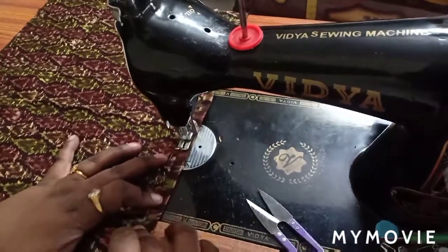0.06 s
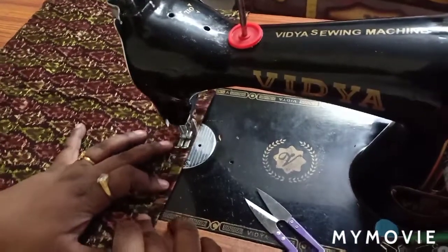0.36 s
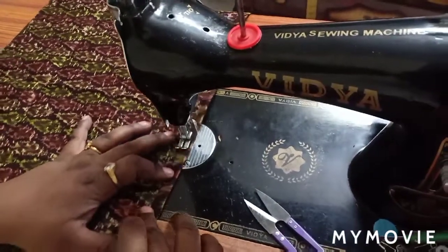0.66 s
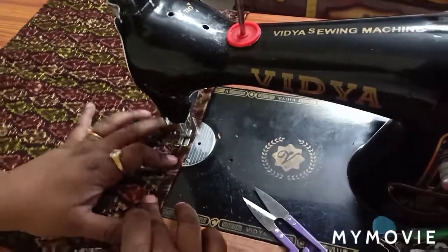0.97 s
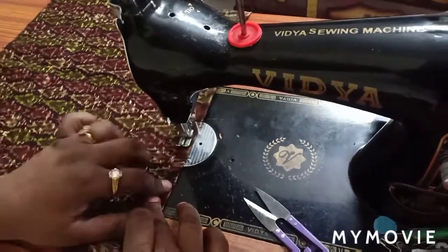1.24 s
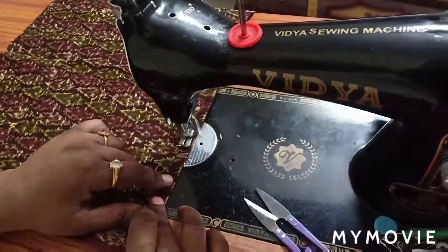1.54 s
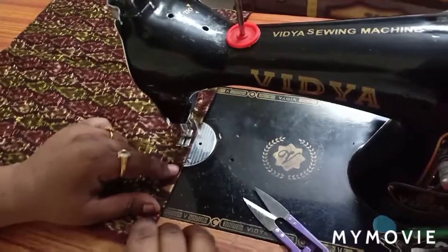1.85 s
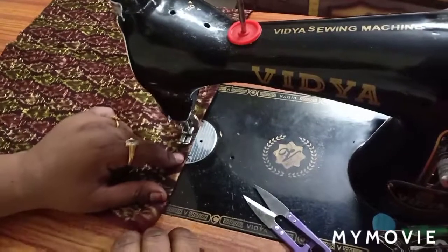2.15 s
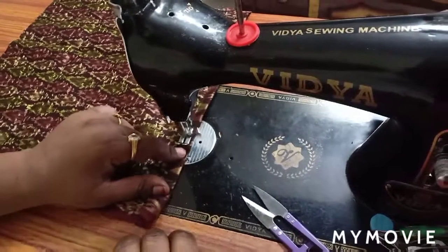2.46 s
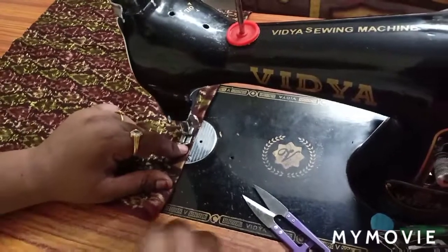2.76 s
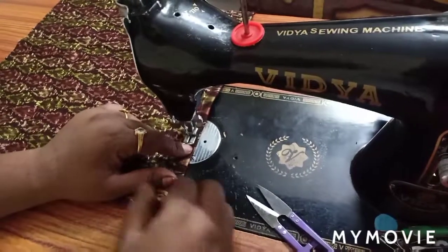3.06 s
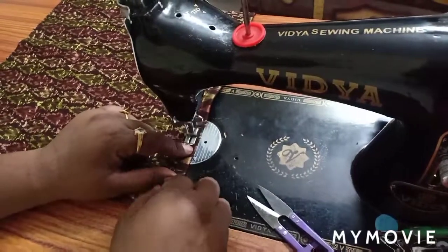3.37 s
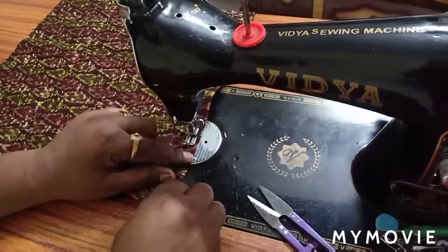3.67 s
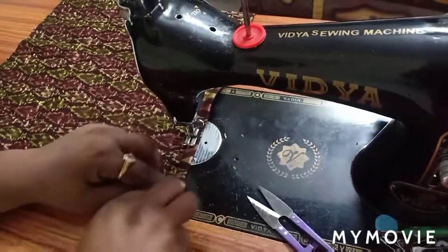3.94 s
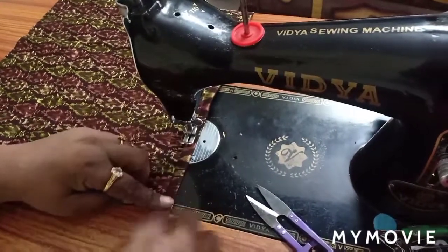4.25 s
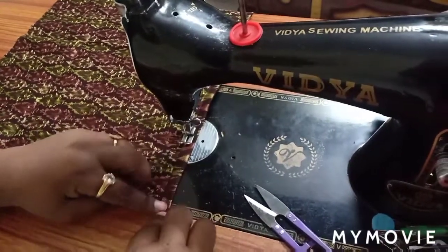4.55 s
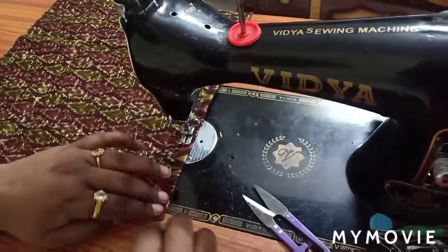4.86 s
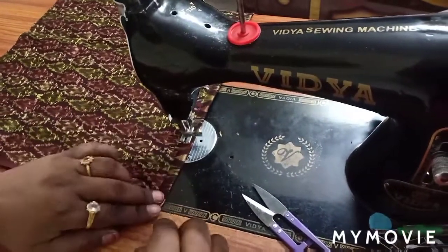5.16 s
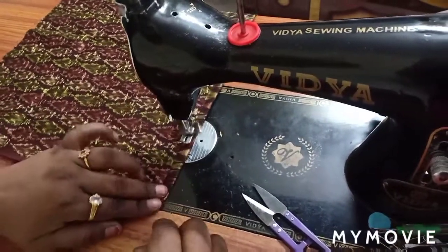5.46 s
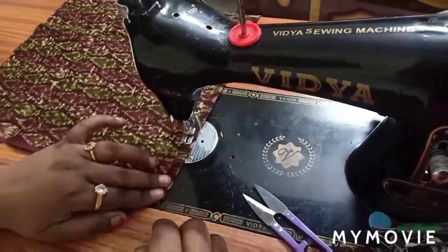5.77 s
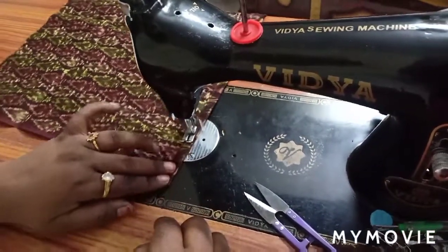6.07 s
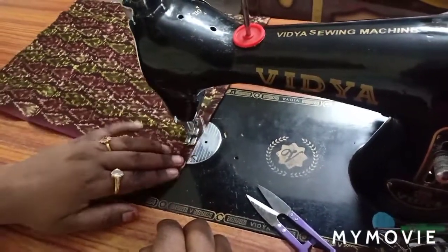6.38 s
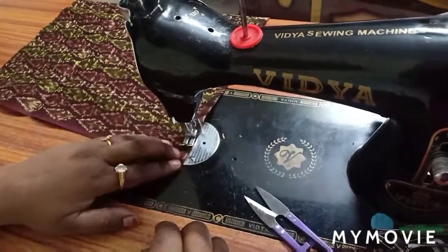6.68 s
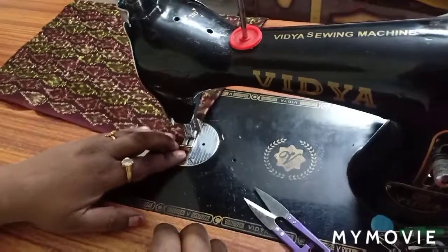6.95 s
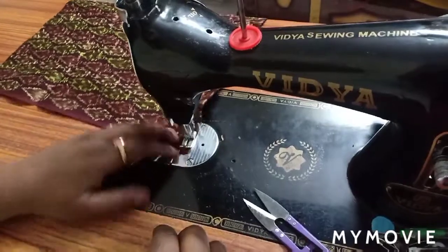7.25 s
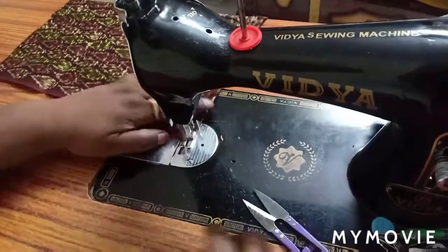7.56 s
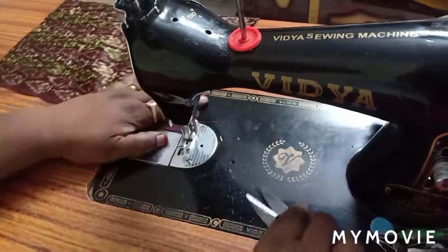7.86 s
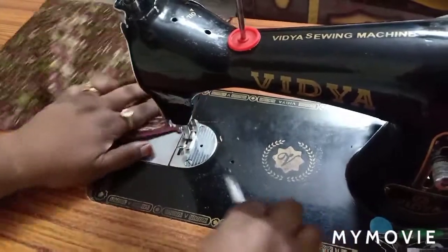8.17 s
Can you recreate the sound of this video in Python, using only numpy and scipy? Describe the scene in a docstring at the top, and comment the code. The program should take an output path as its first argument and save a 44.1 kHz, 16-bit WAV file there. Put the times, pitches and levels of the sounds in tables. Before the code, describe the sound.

A belt-driven sewing machine is already running close by in a small quiet room, making a rapid metallic clatter with needle ticks and a pulsing hum from the wooden table. From about 2 seconds it slows, breaking into separate, fading clacks and clinks, with short high belt squeaks from 3 seconds. It stops at about 3.8 seconds. In the pause, cloth slides very faintly over low room noise. At 5.2 seconds the belt snaps taut with a brief ring, the motor buzzes and the belt gives a high, wavering squeal that fades by about 6.2 seconds. Meanwhile the machine gathers speed and is stitching fast again by 6 seconds, its pace rising and falling slightly. Sharper metal clacks join from 7.5 seconds, and it is still running, a little slower, at the end, around 8.4 seconds.

```python
"""Belt-driven sewing machine

A cast-iron machine stitches cloth on a wooden table in a small quiet room. Each shaft turn repeats a
round of impacts (feed, needle, shuttle, take-up lever) that excite resonances in wood and steel, over
the chatter of loose joints. It coasts to a halt with clacks and belt squeaks, and the cloth slides.
Then the belt snaps taut and squeals, the loaded motor buzzes, and a second seam is sewn."""
import sys
import numpy as np
from scipy import signal
from scipy.fft import rfft, irfft
from scipy.io import wavfile
from scipy.ndimage import uniform_filter1d

SR = 44100
rng = np.random.default_rng(int(sys.argv[2]) if len(sys.argv) > 2 else 0)


def to_wav(sig):
    """Store sig (one row per channel, or 1-D mono) as 16-bit WAV at the path in sys.argv[1].

    Samples outside -1..1 are clipped; the rate is SR.
    """
    pcm = np.clip(np.atleast_2d(sig), -1, 1) * 32767
    pcm = np.round(pcm).astype(np.int16)
    wavfile.write(sys.argv[1], SR, pcm.T)  # frames by channels


N = 371322
TIME = np.arange(N) / SR
TAIL = TIME[:SR // 2]  # time axis of an impulse response

# the impacts of one stitch: angle_turns, table_db, steel_db, tick_db
STROKES = [(-.43, 3, -3.5, -15.5), (-.3, -4.5, -1.5, -13.5), (-.15, 2, -4, 2.5), (-.08, -0.5, -3, 5.5),
           (-.02, -0.5, -0.5, 3), (.025, -3.5, -0.5, -8), (.1, -3, -5, -11.5), (0.301, 1, -2.5, -25)]
# single clacks, as slack joints fall over or the needle hits a thick fold:
# start_s, steel_db, table_relative_db, tick_relative_db, clink_relative_db, clink_hz
CLACKS = [(2.08, -12.5, -7, -13, 6, 2730), (2.144, -10.5, -6, -5, 5.5, 2720),
          (2.213, -10.5, -4, -6, 3, 2580), (2.283, -9.5, -4, -4, 5, 2710), (2.359, -10.5, -4, -11, 7, 2760),
          (2.436, -12.5, -4, -8, 6, 2440), (2.5132, -13.5, -6, -18, 7, 2690), (2.527, -17, 0, -5, 0, 2750),
          (2.606, -19, -4, -16, 4, 2790), (2.7063, -14.5, -2, -14, 3, 2860), (2.723, -16, -3, -5, 3, 4720),
          (2.7587, -21, -1, -20, 6, 1500), (2.8201, -18, -4, -16, 6, 2760), (2.84, -17, -4, -6.5, 2, 4720),
          (2.9478, -22, -9, -18, 9, 2740), (2.97, -19.5, -5, -3, 5, 4720), (3.0313, -26, -4, -22, 4, 2690),
          (3.0992, -24, -8, -20, 10, 2790), (3.123, -23, -4, -3, 2, 4720), (3.1807, -19, -10, -30, 9, 2000),
          (3.1995, -22.5, -3, -28, 5, 2770), (3.296, -25, -6, -25, 5, 2750), (3.329, -22, -2, -12, 2, 5200),
          (3.4027, -29, 0, -29, 7, 1400), (3.433, -24, -8, -28, 8, 2540), (3.5342, -19.5, -2, -14, 6, 1740),
          (3.539, -22.5, -1, -9, 7, 910), (3.5574, -25, -2, -25, 3, 2710), (3.6436, -28, -1, -25, 6, 380),
          (3.713, -22, -9, -18, 8, 2600), (7.545, -12, -2, -13, 4, 2600), (7.6725, -5, -4, -10.5, 3, 1970),
          (7.7404, -7, 0, -5, 6, 1980), (7.922, -13, -6, -8, 6, 2050), (7.99, -10, 1, 0, 8, 1950),
          (8.06, -10, 2, -7, 6, 1950), (8.1319, -6.5, 1, -6, 9.5, 1950), (8.209, -6, -3, -9, 4.5, 1970),
          (8.283, -11, -3, -2, 7, 2020)]
# normal modes of the bed plate: pitch_hz, level_db, t60_s
PLATE_MODES = [(1480, -4.5, .22), (1690, -9.5, .2), (1999, -7, .14), (2112, -2.5, .13), (2390, -2.5, .16),
               (2438, -3, 0.24), (2571, -1, .15), (2715, -1, 0.099), (3647, -4.5, 0.16), (4320, -5, .12),
               (4760, -5, .08), (5640, -8.5, 0.13)]
# spectrum of the belt rasping on the pulley: frequency_hz, level_db
RASP_SPECTRUM = [(600, -72), (2000, -32), (2450, -5), (2640, -1), (2830, -5), (3100, -23), (6000, -55)]


def amp(db):
    """Decibels to amplitude ratio."""
    return 10 ** (np.asarray(db) / 20)


def unit(x):
    """Normalisation to unit energy."""
    return x / np.sqrt(np.sum(x ** 2))


def curve(rows, time=TIME):
    """Linear interpolation between (time_s, value) rows."""
    return np.interp(time, *np.transpose(rows))


def envelope(start_s, attack_s, end_s, release_s):
    """Linear attack, hold, exponential release."""
    return np.clip((TIME - start_s) / attack_s, 0, 1) * np.exp(-np.maximum(TIME - end_s, 0) / release_s)


def wander(rate_hz):
    """Random modulation: smoothed noise of unit standard deviation."""
    size = int(SR / rate_hz)
    x = uniform_filter1d(uniform_filter1d(rng.standard_normal(N), size), size)
    return x / np.std(x)


def fade(t60):
    """Exponential damping, by 60 dB in t60 seconds."""
    return np.exp(-np.log(1000) * TAIL / t60)


def ring(force, response):
    """A linear system convolves the force with its impulse response."""
    return signal.fftconvolve(force, response)[:N]


def colour(x, spectrum):
    """Minimum-phase filter of unit energy, shaped by (frequency_hz, level_db) rows."""
    size = 2048
    hz, db = np.transpose(spectrum)
    log_hz = np.log(np.maximum(np.fft.rfftfreq(size, 1 / SR), 1))
    cepstrum = irfft(np.log(amp(np.interp(log_hz, np.log(hz), db))))
    cepstrum[1:size // 2] *= 2
    cepstrum[size // 2 + 1:] = 0
    response = unit(irfft(np.exp(rfft(cepstrum))))
    return signal.fftconvolve(x, response)[:len(x)]


def modes(rows):
    """Free vibration as a sum of damped normal modes."""
    return unit(sum(amp(db) * fade(t60) * np.sin(2 * np.pi * (hz * TAIL + rng.random()))
                    for hz, db, t60 in rows))


def body(spectrum, t60, room_db):
    """Overlapping modes answer a blow like decaying noise, followed by the room's reverberation."""
    crack, room = rng.standard_normal((2, len(TAIL)))
    reverberation = unit(room * fade(t60=0.49) * (1 - fade(0.026)))
    bins = rfft(unit(crack * fade(t60)) + amp(room_db) * reverberation)
    # the modes share the energy evenly over wide bands, so the part keeps its own colour
    bins /= np.sqrt(uniform_filter1d(np.abs(bins) ** 2, size=60))
    taper = np.cos(np.pi / 2 * TAIL / TAIL[-1])
    return unit(colour(irfft(bins, len(TAIL)) * taper, spectrum))


def strike(force, spots, spectrum, t60, room_db):
    """The response depends on the point of impact: each blow lands on one of several spots."""
    spot = rng.integers(0, spots, N)
    return sum(ring(force * (spot == k), body(spectrum, t60, room_db)) for k in range(spots))


def blows(times, sizes):
    """Brief contacts idealised as impulses."""
    inside = (times >= 0) & (times < TIME[-1])
    return np.bincount((times[inside] * SR).astype(int), sizes[inside], N)


def rebounds(times, sizes, bounce_s, bounce_db):
    """Inelastic collision: each blow rebounds three times at uneven gaps, weaker each time."""
    force = blows(times, sizes)
    for gap in rng.standard_normal((3, len(times))):
        times = times + bounce_s * np.exp(.5 * gap)
        sizes = -sizes * amp(bounce_db)
        force = force + blows(times, sizes)
    return force


def shaft():
    """Angle in turns is the integral of speed in turns a second; one turn makes one stitch."""
    # shaft speed under the foot pedal: time_s, turns_per_s
    pedal = [(0.0, 18.8), (0.393, 22.49), (0.697, 19.27), (1.065, 22.43), (1.6, 15.15), (1.885, 17.71),
             (2.257, 14.24), (2.438, 11.75), (3.323, 4.05), (3.501, 5.39), (3.78, 0.0), (5.19, 0),
             (5.27, 4.15), (5.466, 9.48), (5.761, 16.68), (6.098, 20.09), (6.503, 14.41), (6.886, 19.53),
             (7.16, 15.09), (7.38, 18.86), (7.675, 14.51), (7.885, 16.49), (8.42, 10.88)]
    speed = curve(pedal)
    return .8044 + np.cumsum(speed) / SR, speed


def once_a_turn(turns, angle_turns):
    """The times at which the shaft passes a given angle."""
    return np.interp(np.arange(1, turns[-1]) + angle_turns, turns, TIME)


def rattle(turns, speed, stroke_db, chatter_db, chatter_per_s, scatter_db, bounce_s, bounce_db):
    """Backlash: the periodic blows on a part jitter and rebound, with random chatter between them."""
    angles = np.arange(np.ceil(turns[-1]) + 1)[:, None] + np.array(STROKES)[:, 0]
    play, force = rng.standard_normal((2,) + angles.shape)
    times = np.interp(angles + .008 * play, turns, TIME, left=-1, right=-1).ravel()
    knocks = rebounds(times, amp(stroke_db + scatter_db * force).ravel(), bounce_s, bounce_db)
    # down to 15 turns a second, a slower shaft packs the same energy into fewer knocks
    knocks = unit(knocks) * np.sqrt(turns[-1] * SR / np.maximum(speed, 15))
    chatter = (rng.random(N) < chatter_per_s / SR) * rng.standard_normal(N)
    share = amp(chatter_db)
    return (knocks + share * unit(chatter) * np.sqrt(N)) / np.hypot(1, share)


def impact_forces(turns, speed, running):
    """Impact excitation: blows on table, steel and needle plate grow with speed and needle effort."""
    # how hard the needle pushes through the folded cloth: time_s, level_db
    effort = [(.12, 2), (.65, -2.5), (1.1, -2), (1.3, -5.5), (1.5, -4), (1.95, -2.5), (2.35, -2.5),
              (2.65, -2.5), (2.9, -4.5), (3.6, -7), (6.0, 3), (6.35, -1.5), (6.85, 1.8), (7.05, -1.5),
              (7.3, 1), (7.4, 1), (7.62, 1.5), (7.82, 2), (8.2, 2), (8.42, 3.5)]
    effort_db = curve(effort)
    shudder = envelope(start_s=5.25, attack_s=0.27, end_s=5.674, release_s=0.14)
    stitch_db = 0.73 * rng.standard_normal(int(turns[-1]) + 2)[np.rint(turns).astype(int)]
    overspeed = speed - 18  # turns a second above cruising speed
    # above cruising speed the knocks stand out of the chatter
    loose_db = 3 + 0.16 * effort_db + 0.5 * shudder - 0.6 * np.maximum(overspeed, 0)

    def drive(cruise_db, speed_slope_db, shudder_db):
        level_db = cruise_db + speed_slope_db * overspeed + shudder_db * shudder
        return running * amp(level_db + effort_db + stitch_db)

    _, table_db, steel_db, tick_db = np.transpose(STROKES)
    table = rattle(turns, speed, table_db, chatter_db=loose_db - 4, chatter_per_s=1500,
                   scatter_db=1.5, bounce_s=.0012, bounce_db=-6)
    steel = rattle(turns, speed, steel_db, chatter_db=loose_db - 7, chatter_per_s=600,
                   scatter_db=1.54, bounce_s=.0013, bounce_db=-2.5)
    tick = rattle(turns, speed, tick_db, chatter_db=loose_db - 5, chatter_per_s=1300,
                  scatter_db=3, bounce_s=.0011, bounce_db=-1.5)
    table *= drive(cruise_db=-33, speed_slope_db=0.83, shudder_db=6)
    steel *= drive(cruise_db=-28, speed_slope_db=0.95, shudder_db=7.4)
    tick *= drive(cruise_db=-42, speed_slope_db=1.52, shudder_db=6.6)
    start_s, clack_db, table_relative_db, tick_relative_db, _, _ = np.transpose(CLACKS)
    steel += rebounds(start_s, amp(clack_db), bounce_s=.0014, bounce_db=-1)
    table += rebounds(start_s, amp(clack_db + table_relative_db), bounce_s=.003, bounce_db=-3)
    tick += rebounds(start_s, amp(clack_db + tick_relative_db), bounce_s=.00074, bounce_db=-7.5)
    return table, steel, tick


def clatter(table, steel, tick):
    """Source and filter: each struck part colours its blows with its own resonances."""
    # spectra of the wooden table, steel works, needle ticks, and hook with needle plate:
    # frequency_hz, level_db
    wood_spectrum = [(40, -42), (65, -27.5), (100, -24.5), (160, -17.5), (205, -18.5), (275, -12),
                     (375, -5.5), (490, -10), (659, -7.5), (782, -11), (840, -8), (1030, -15.5),
                     (1130, -11.5), (1320, -14.5), (1450, -7), (1550, -13), (2020, -45), (3410, -120)]
    steel_spectrum = [(910, -35), (1550, -9.5), (1610, -12), (1820, -2.5), (2040, -2), (2260, -3.5),
                      (2380, -1.5), (2660, 2), (2790, 1), (3440, -13), (3750, -16), (4090, -15.5),
                      (4600, -10.5), (5460, -12), (7500, -25), (9750, -37), (16500, -120)]
    tick_spectrum = [(3820, -24), (6500, -3), (7780, -3.5), (9070, -5), (9760, -15), (11500, -5.5),
                     (12500, -8.5), (13700, -0.5), (15200, -15.5), (15600, -11)]
    hook_spectrum = [(2800, -27.5), (3800, -2.5), (4700, -1), (5900, -1), (7500, -21.5)]
    wood = strike(table, spots=4, spectrum=wood_spectrum, t60=0.024, room_db=-4)
    works = strike(steel, spots=3, spectrum=steel_spectrum, t60=0.017, room_db=-7.5)
    plate = amp(-8.5) * ring(steel, modes(PLATE_MODES))
    needle = body(tick_spectrum, t60=0.023, room_db=-9)
    hook = amp(4.5) * body(hook_spectrum, t60=0.0085, room_db=-5)
    return wood + works + plate + ring(tick, needle + hook)


def needle_bar_slaps(turns):
    """The bar rebounds in its guide once a stitch and excites the upper modes of the bed plate."""
    # spectrum of the slap: frequency_hz, level_db
    slap_spectrum = [(1200, -31.5), (1800, -7), (2080, -2), (2230, -3), (2400, -1), (2700, 2), (3000, -6.5),
                     (3400, -18), (10000, -53)]
    # strength of the slap, greatest at full speed: time_s, level_db
    slap_force = [(0, -3), (.26, 2.5), (.48, -1), (.62, -10), (.8, -8), (.98, -2.5), (1.12, -3), (1.4, -17),
                  (2.4, -20), (3.6, -45), (5.4, -20), (5.75, -4), (6.1, -3), (6.45, -18), (6.86, -9),
                  (7.15, -17), (7.4, -15), (8.42, -22)]
    times = once_a_turn(turns, angle_turns=-.11)
    hits = rebounds(times, amp(curve(slap_force, times)), bounce_s=.0028, bounce_db=-1)
    slaps = strike(hits, spots=3, spectrum=slap_spectrum, t60=.024, room_db=-8.5)
    return slaps + amp(-8) * ring(hits, modes(PLATE_MODES[3:]))


def table_hum(turns):
    """The table top is a soundboard: each downstroke thuds, and its modes swell into a pulsing hum."""
    # how hard the needle bar drums the top: time_s, level_db
    drum_force = [(0, -0.5), (.2, 1), (.45, 0.5), (.62, -2.5), (1.12, -0.5), (1.4, -12), (1.7, -10.5),
                  (2.15, -7), (2.6, -14.5), (3.6, -19.5), (5.5, -11.5), (6.0, -2), (6.5, -8), (7.3, -6),
                  (8.15, -1.5), (8.42, -5.5)]
    # normal modes of the top: pitch_hz, level_db, t60_s
    top_modes = [(299.5, -10, 0.31), (347.1, 1, .27), (371, 0, .22), (392, -5, .16), (418.4, -7, .15),
                 (653, -14.5, .2), (833, -13, .2), (1152, -17, .25)]
    # spectrum of the dull blow: frequency_hz, level_db
    thud_spectrum = [(220, -45), (310, -14), (372, 1), (425, -3), (540, -30), (1000, -70.5)]
    times = once_a_turn(turns, angle_turns=-.12)
    drum = blows(times, amp(rng.standard_normal(len(times)))) * amp(curve(drum_force))
    hum = sum(amp(db) * fade(t60) * np.cos(2 * np.pi * hz * TAIL) for hz, db, t60 in top_modes)
    swelling_hum = unit(hum * (1 - fade(0.057)))
    return amp(1) * ring(drum, swelling_hum) + amp(-4) * colour(drum, thud_spectrum)


def resonance(hz, centre_hz, width_hz):
    """Lorentzian response of a single resonance."""
    return 1 / (1 + (2 * (hz - centre_hz) / width_hz) ** 2)


def stand_boom(turns, speed):
    """Forced vibration: the stand booms on the nearest shaft harmonic; the third rocks its legs."""
    # level of the boom in each seam: time_s, level_db
    first_seam = [(0.0, -42), (0.1, -43), (0.31, -53.5), (0.5, -39), (0.6, -66), (0.7, -47), (1.59, -56),
                  (1.69, -44.5), (1.97, -60), (2.19, -44), (2.36, -53), (2.61, -49.5), (3.14, -64),
                  (3.7, -60)]
    second_seam = [(5.3, -63), (5.77, -36), (5.8, -46), (6.19, -40), (6.271, -65), (6.34, -44.5),
                   (7.52, -56.5), (7.7, -37.5), (7.99, -54), (8.31, -40), (8.42, -50)]
    orders = np.arange(5, 32)[:, None]
    share = resonance(orders * speed, centre_hz=134.6, width_hz=5)
    boom = np.sum(share * np.sin(2 * np.pi * orders * turns), axis=0)
    boom /= np.sum(share ** 2, axis=0) ** 0.55  # evens out the level between resonances
    boom_db = curve(np.vstack([first_seam, second_seam])) - 0.5 + 2 * wander(23)
    legs = np.sin(6 * np.pi * turns) * resonance(3 * speed, centre_hz=65, width_hz=5.8)
    return np.sqrt(2) * (amp(boom_db) * boom + amp(-55.5) * legs)


def room_air():
    """The room's background is stationary coloured noise."""
    # spectrum of the air: frequency_hz, level_db
    air_spectrum = [(15, -29.5), (25, -49.5), (27, -36), (50, -23), (110, -11), (188, -4), (253, -10.5),
                    (289, -4.5), (322, -5), (469, -7), (741, -9), (1170, -12), (1490, -18), (2490, -13),
                    (3930, -31), (15500, -55.5)]
    return amp(-55) * colour(rng.standard_normal(N), air_spectrum)


def joint_clinks():
    """Heavily damped resonance: each clack rings briefly around the pitch of the part that is hit."""
    slope_db_per_octave = -39
    out = np.zeros(N + len(TAIL))
    for start_s, db, _, _, relative_db, hz in CLACKS:
        band = [(hz * 2 ** octaves, slope_db_per_octave * abs(octaves)) for octaves in (-2, 0, 2)]
        start = int(start_s * SR)
        out[start:start + len(TAIL)] += amp(db + relative_db) * body(band, t60=0.037, room_db=-6)
    return out[:N]


def belt_squeaks():
    """Friction on the coasting pulley gives short wavering tones that sag in pitch, over a rasp."""
    # squeaks of the belt: centre_s, half_width_s, pitch_hz, level_db
    squeaks = [(2.975, .025, 2720, -42), (3.146, 0.02, 2650, -40), (3.305, 0.028, 2760, -47),
               (3.332, 0.0093, 5230, -46.5), (3.35, 0.034, 2680, -44), (3.543, 0.011, 4520, -49),
               (3.564, 0.077, 2690, -49.5), (3.745, 0.03, 2430, -51)]
    sag_hz_per_s = 850
    waver, flutter = 1 + 0.00603 * wander(128), amp(2.5 * wander(110))
    tones, rub = 0, 0
    for centre_s, half_width_s, hz, db in squeaks:
        swell = amp(db) * np.exp(-((TIME - centre_s) / half_width_s) ** 2)
        pitch_hz = (hz - sag_hz_per_s * (TIME - centre_s)) * waver
        tones += swell * np.sin(2 * np.pi * np.cumsum(pitch_hz) / SR)
        rub += swell
    rasp = ring(rub * rng.standard_normal(N), body(RASP_SPECTRUM, t60=0.027, room_db=-3.5))
    return tones * flutter + amp(-0.5) * rasp


def cloth_swishes():
    """Sliding friction of fibres makes grainy noise as the fabric is straightened."""
    # cloth sliding under the hands: centre_s, half_width_s, level_db
    slides = [(4.1, 0.071, -72), (4.343, 0.067, -70.5), (4.75, 0.13, -80), (5.1, 0.017, -76)]
    swish = sum(amp(db) * np.exp(-((TIME - centre_s) / half_width_s) ** 2)
                for centre_s, half_width_s, db in slides)
    fibres = rng.standard_normal(N) * amp(4 * rng.standard_normal(N))
    return colour(swish * fibres, [(1500, -30), (5000, 5), (9000, -19), (15000, -14)])


def belt_snap():
    """The belt snaps taut, and the impulse sets the motor bracket into free vibration."""
    # normal modes of the bracket: pitch_hz, level_db, t60_s
    bracket_modes = [(448, -3.5, 0.18), (521, -2, 0.56), (1410, -4, 0.17), (1840, -5, 0.18),
                     (4540, 3, 0.096), (4640, -7, 0.14), (5450, -3, 0.066)]
    return ring(blows(times=np.array([5.189]), sizes=amp([-7.5])), modes(bracket_modes))


def motor_buzz(mains_hz, brushes):
    """The loaded motor's force pulses at twice the mains frequency; beats and brush noise ring it."""
    # spectrum of the motor: frequency_hz, level_db
    buzz_spectrum = [(150, -44), (250, -29), (516, -4), (658, -12), (913, -7), (1050, -13), (1820, -4.5),
                     (2160, -11), (2620, 3.5), (3330, -21), (4550, -3), (8920, -25), (9720, -30),
                     (13500, -22), (15500, -35)]
    load = amp(-31.5) * envelope(start_s=5.183, attack_s=0.014, end_s=5.77, release_s=0.092)
    times = np.arange(0, TIME[-1], .5 / mains_hz)
    beats = blows(times, amp(2 * rng.standard_normal(len(times)))) * np.sqrt(SR / mains_hz / 2)
    return ring((.5 * beats + 0.89 * brushes) * load, body(buzz_spectrum, t60=0.026, room_db=-2))


def belt_squeal(pulse, brushes):
    """Stick-slip friction: the belt sings, rasps and rings the pulley in uneven jerks."""
    # how hard the belt slips until the shaft catches up: time_s, level_db
    slip_levels = [(5.265, -49), (5.288, -20.5), (5.32, -25.5), (5.39, -27), (5.46, -24), (5.55, -23),
                   (5.62, -23), (5.68, -23.5), (5.8, -28), (6.1, -31), (6.3, -45)]
    # tones of the slipping belt: pitch_hz, level_db
    partials = [(2577, -3), (4520, -21), (5160, -27)]
    # normal modes of the pulley: pitch_hz, level_db, t60_s
    pulley_modes = [(2587, -1.5, 0.1), (2610, -3, .07), (2680, -8, .06), (2820, -9, .09), (2870, -13, .09)]
    throb_depth, jerks_per_s = 0.19, 45
    start_s, end_s = slip_levels[0][0], slip_levels[-1][0]
    slip = amp(curve(slip_levels)) * (TIME > start_s) * (TIME < end_s)
    waver = 1 + 0.003 * wander(26.1) + 0.002 * wander(153)
    tones = sum(amp(db) * np.sin(2 * np.pi * np.cumsum(hz * waver) / SR) for hz, db in partials)
    squeal = tones * slip * (1 + throb_depth * pulse) * amp(2 * wander(90))
    rasp = amp(-12) * ring(brushes * slip, body(RASP_SPECTRUM, t60=0.025, room_db=-1))
    times = np.arange(start_s, end_s, 1 / jerks_per_s)
    late, force = rng.standard_normal((len(times), 2)).T
    jerks = blows(times + .005 * late, amp(24 + 2.5 * force))
    return squeal + rasp + ring(jerks * slip, modes(pulley_modes))


def motor_start():
    """Amplitude modulation: the same pulses of the motor shape its buzz and the belt's squeal."""
    mains_hz = 50
    pulse = np.abs(np.sin(2 * np.pi * mains_hz * TIME)) ** 8
    pulse /= np.std(pulse)
    brushes = pulse * rng.standard_normal(N)
    return motor_buzz(mains_hz, brushes) + belt_squeal(pulse, brushes) + belt_snap()


def scene():
    """Superposition of machine, motor, belt, cloth and room air in one channel."""
    turns, speed = shaft()
    running = np.tanh((speed / 4) ** 2)  # the works fall quiet as the shaft stops
    machine = clatter(*impact_forces(turns, speed, running)) + running * stand_boom(turns, speed)
    machine += needle_bar_slaps(turns) + table_hum(turns) + joint_clinks()
    return (machine + motor_start() + belt_squeaks() + cloth_swishes() + room_air())[None]


def record(dry):
    """Band limiting: the phone's steep low-pass filter cuts the highest treble."""
    cutoff_hz = 15650
    return signal.sosfilt(signal.ellip(10, .2, 80, cutoff_hz, fs=SR, output="sos"), dry)


dry = scene()
out = record(dry)
to_wav(out)
```